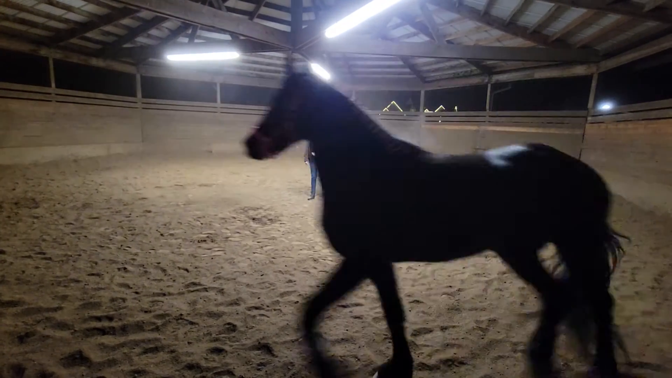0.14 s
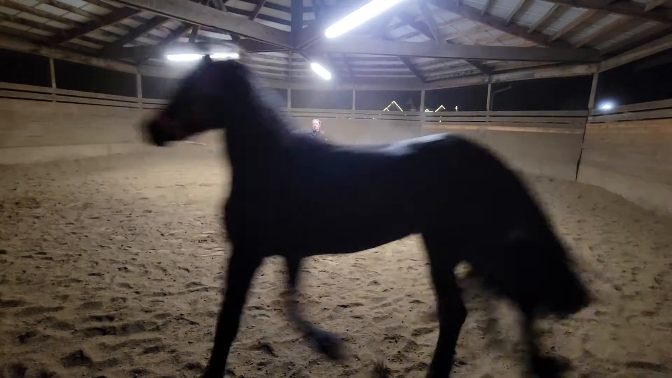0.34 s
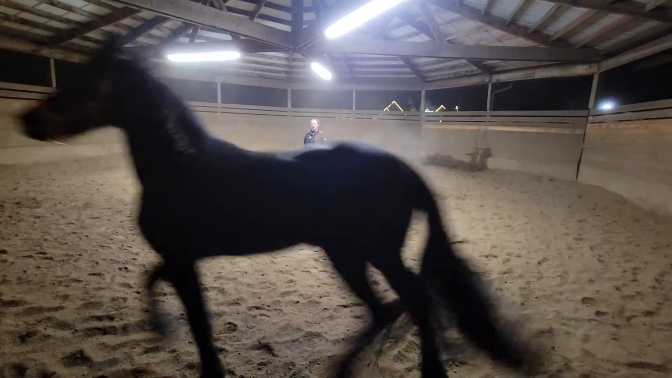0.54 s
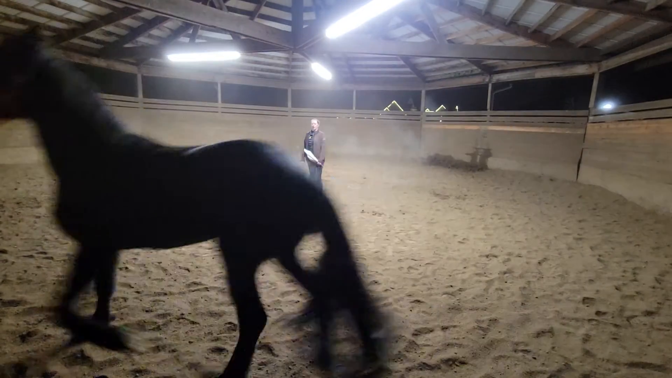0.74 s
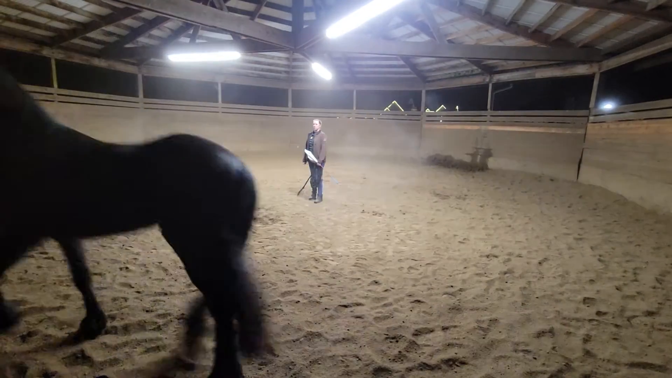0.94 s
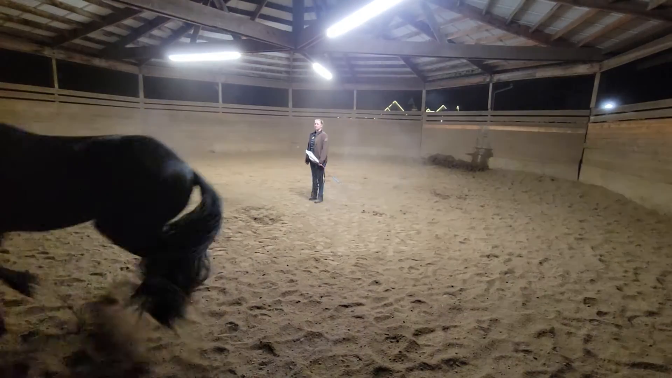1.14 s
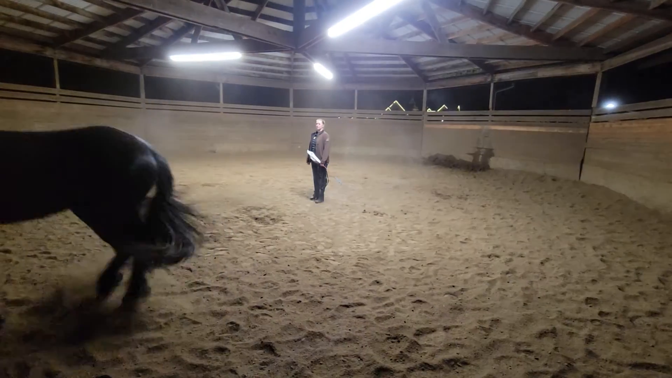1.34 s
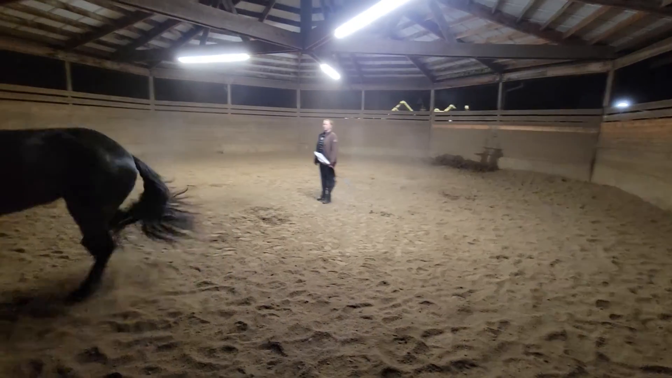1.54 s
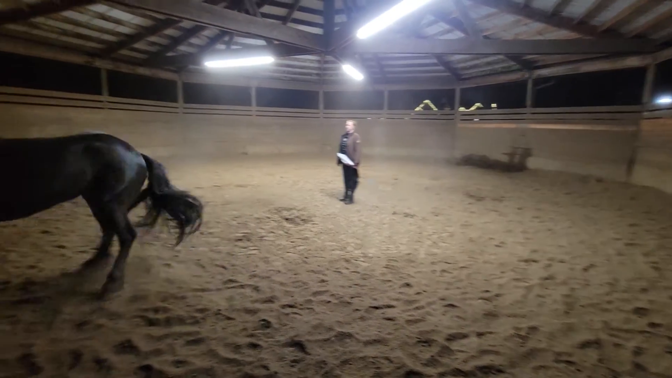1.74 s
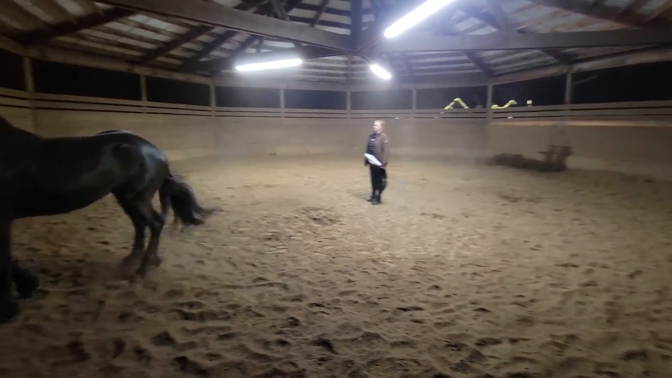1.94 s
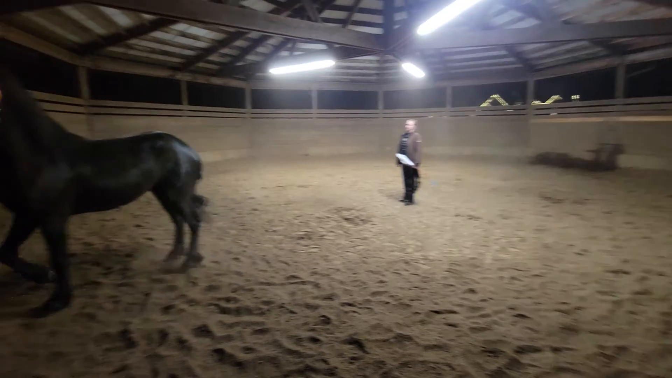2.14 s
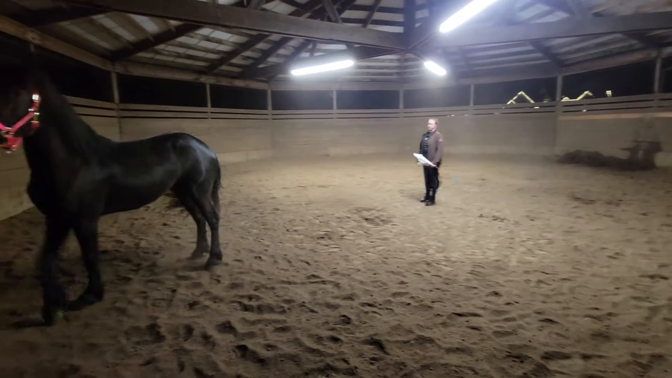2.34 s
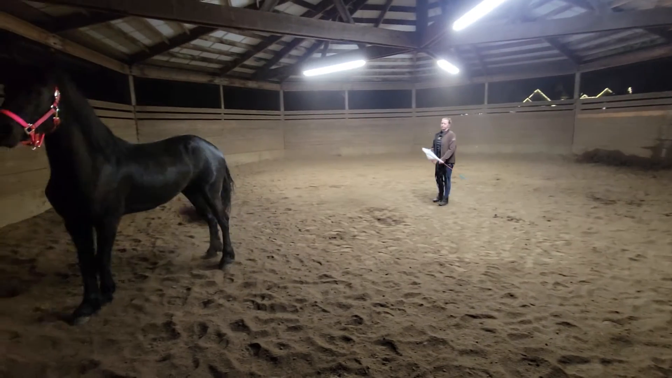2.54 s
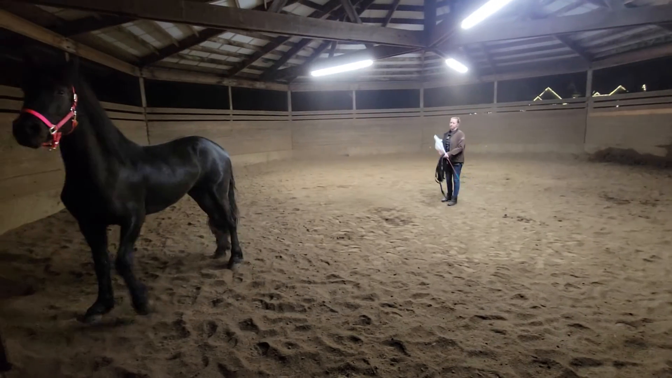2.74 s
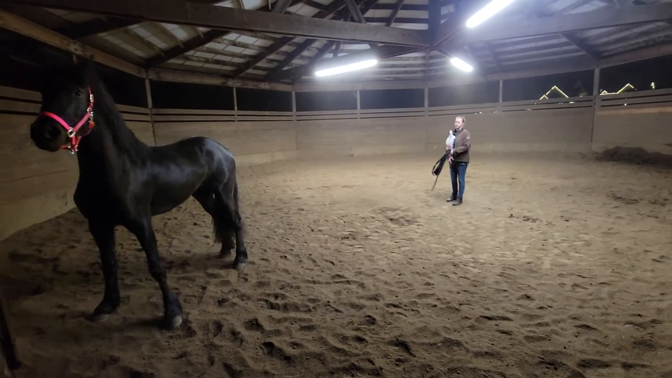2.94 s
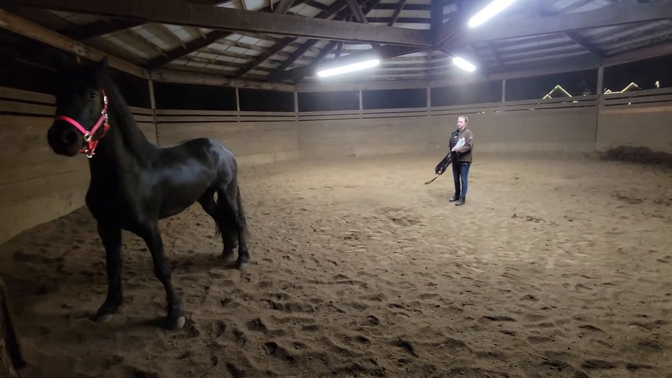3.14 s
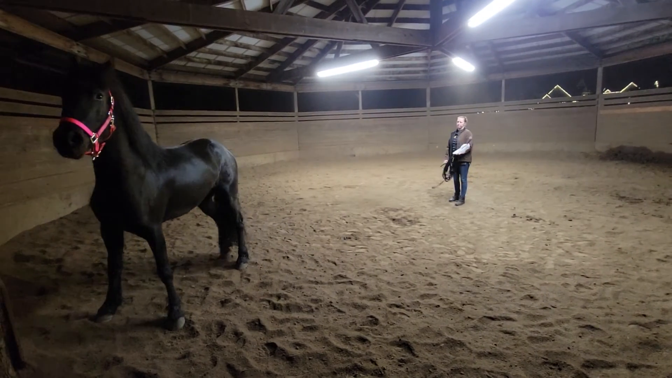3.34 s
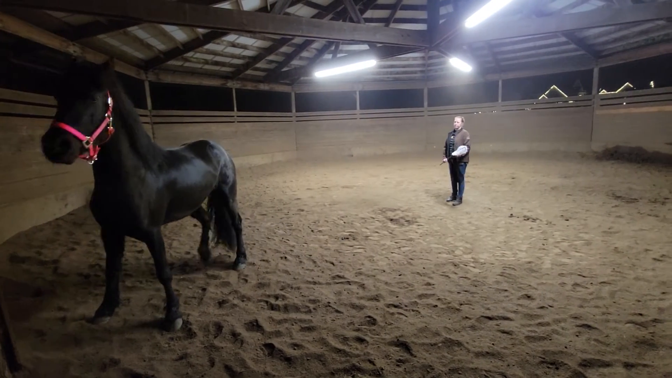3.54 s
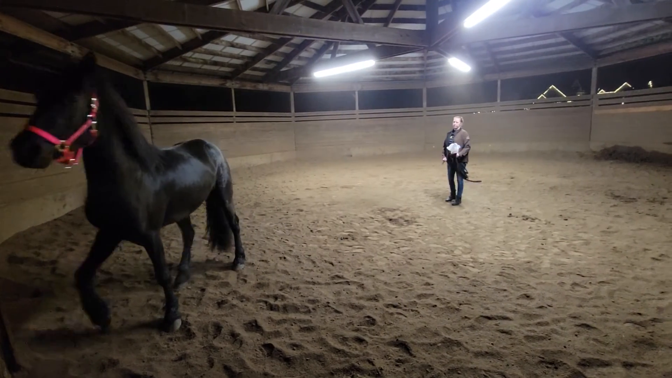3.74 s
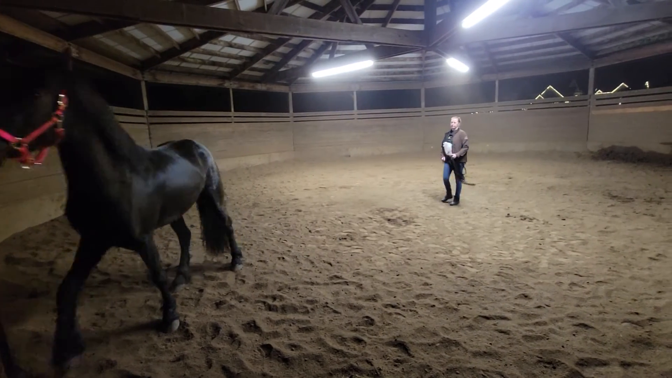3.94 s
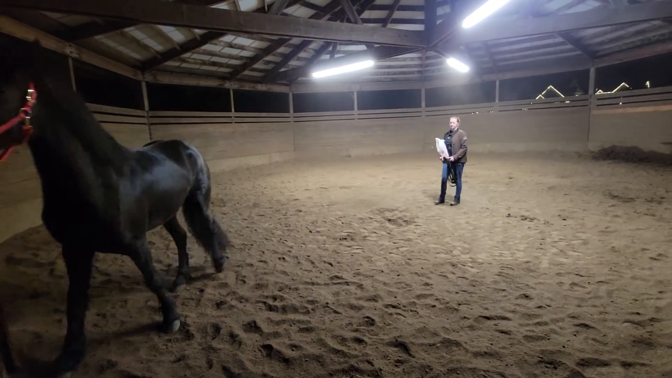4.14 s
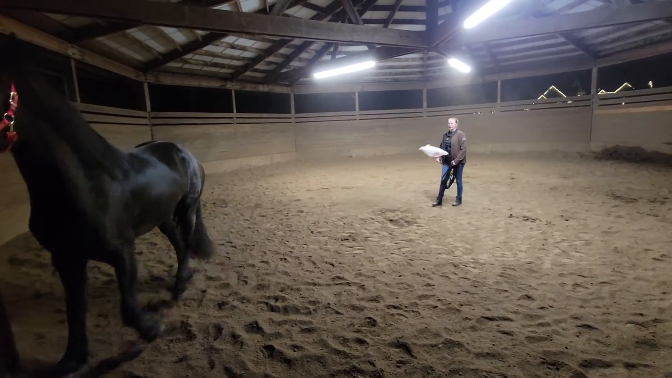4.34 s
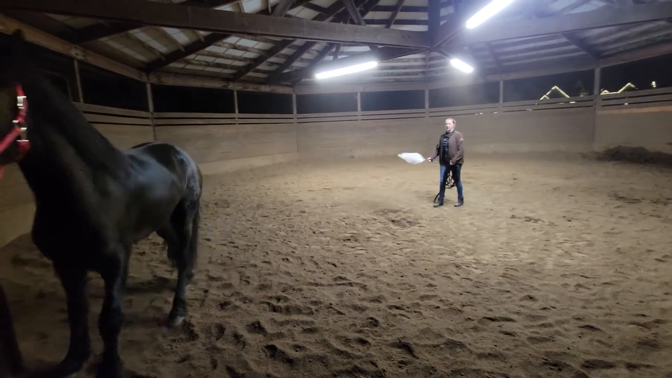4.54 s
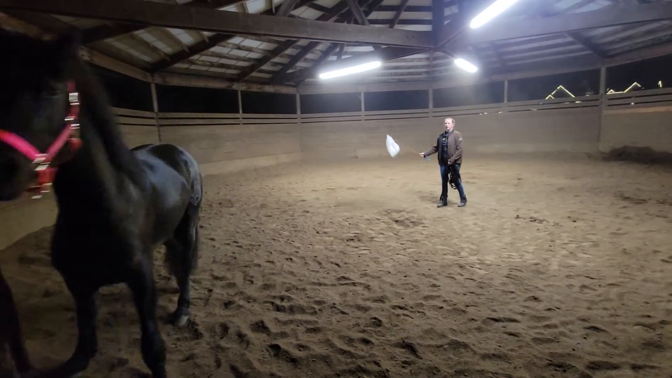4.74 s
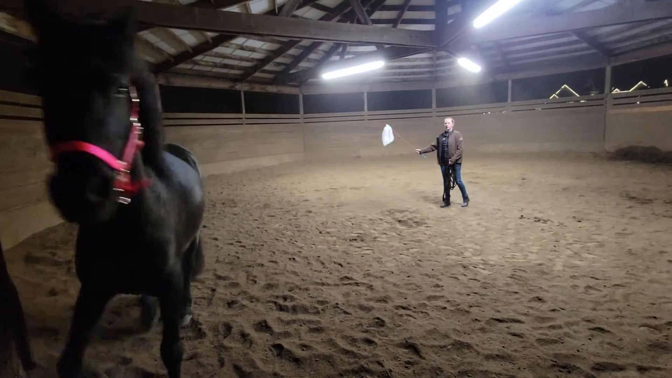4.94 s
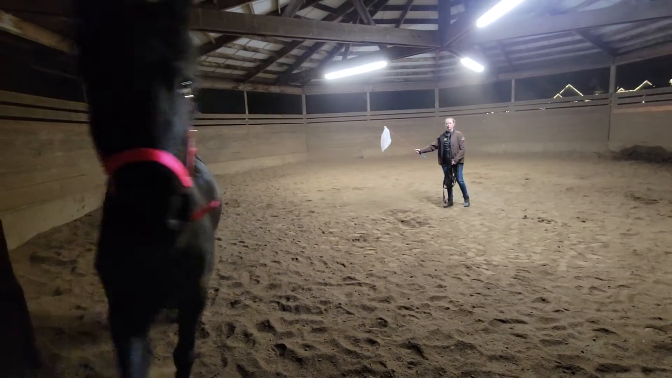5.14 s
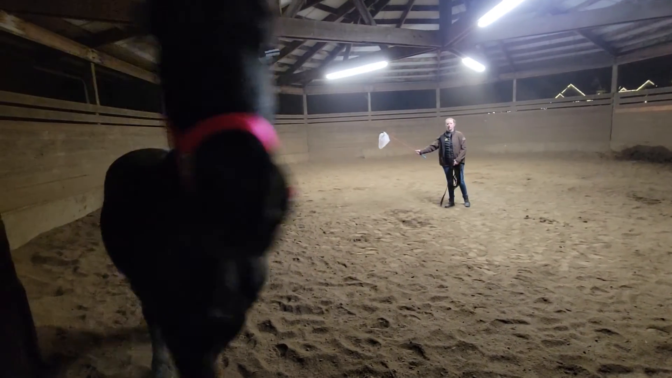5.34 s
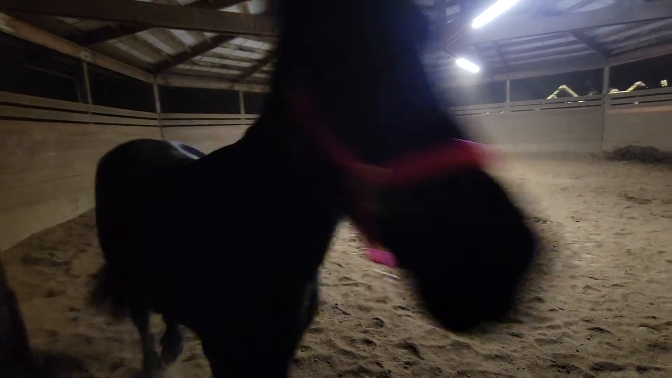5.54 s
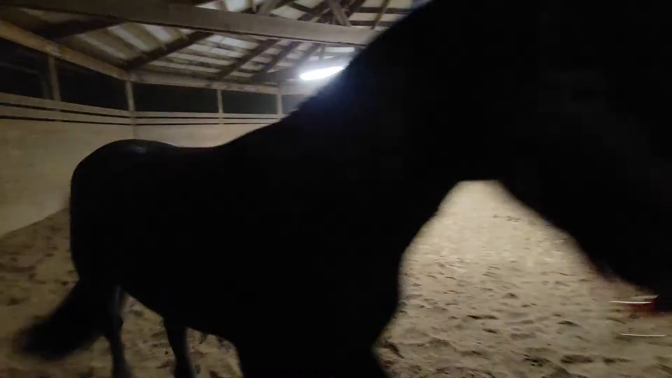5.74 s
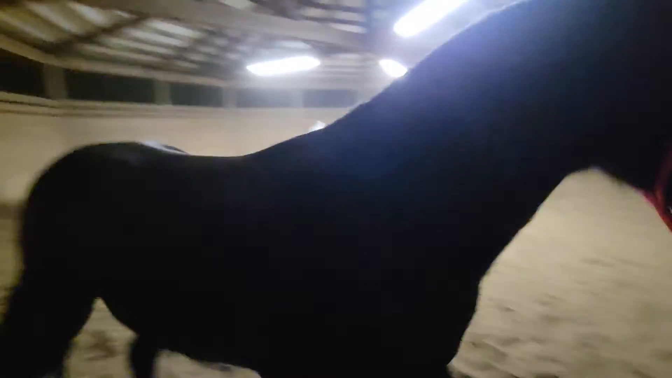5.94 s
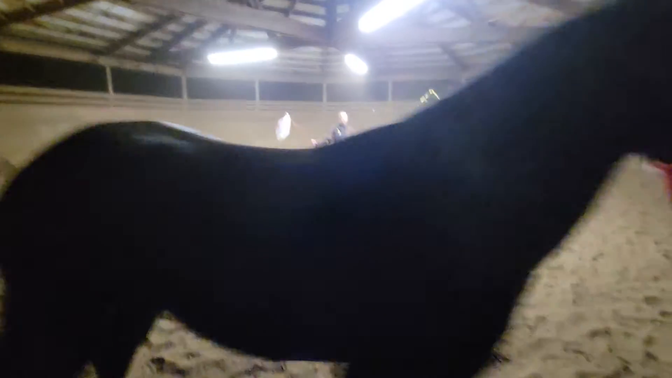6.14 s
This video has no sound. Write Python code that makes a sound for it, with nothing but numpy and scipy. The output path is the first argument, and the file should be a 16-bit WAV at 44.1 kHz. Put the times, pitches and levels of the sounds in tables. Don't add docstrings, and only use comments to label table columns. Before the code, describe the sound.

A horse trots close past in deep sand with muffled thuds and a jingling halter, halts, then walks by as a distant engine climbs and shifts.

```python
import sys
import numpy as np
from scipy import signal
from scipy.io import wavfile
from scipy.ndimage import uniform_filter1d

SR = 44100
rng = np.random.default_rng(int(sys.argv[2]) if len(sys.argv) > 2 else 0)


def pcm_store(signal):
    levels = np.round(np.clip(np.atleast_2d(signal), -1, 1) * 32767)
    wavfile.write(sys.argv[1], SR, levels.astype(np.int16).T)


def nominal_scale(level):
    x = np.asarray(level, float) / 20
    return 10 ** x


N = 276948

# start in seconds, peak in dB, ground pitch in Hz, hoof knock pitch in Hz,
# knock over ground in dB.
HOOF_BLOWS = [(0.0207, -16, 232, 250, 14.5), (.031, -22.5, 190, 257, 8.5), (.043, -25, 115, 290, 2.5),
              (0.4132, -19, 156, 270, 6), (.424, -32, 187, 247, 12), (0.575, -37, 82, 226, -21),
              (0.75, -30.5, 157, 560, 5.5), (0.796, -41, 153, 255, 9), (0.9043, -26.5, 105, 277, 1.5),
              (1.006, -33.5, 96, 350, -1), (1.155, -35, 87.5, 277, -14), (1.197, -39, 106, 312, 15),
              (1.357, -31, 108, 341, 14), (1.363, -20.5, 102, 251, -5), (1.394, -39.5, 103, 250, 12),
              (1.438, -33.5, 161, 246, 5.5), (1.533, -38, 109, 250, 17.5), (1.780, -37.5, 136, 342, 15.5),
              (2.012, -34, 117, 343, 2), (4.107, -38, 127, 276, -3), (5.296, -37.5, 101, 324, 11.5),
              (5.3046, -29, 98, 198, 1), (5.446, -35, 149, 327, 16.5), (5.524, -39, 130, 380, 7),
              (5.893, -35.5, 96, 747, 7.5)]
# start in seconds, peak in dB, pitch in Hz, left-right in dB.
LUMPS = [(0.065, -30.5, 480, 3), (0.376, -36, 554, -8), (0.389, -28, 452, -1.5), (0.417, -15.5, 690, -1),
         (0.427, -25, 585, 12), (0.735, -39, 867, 5), (0.754, -25, 600, -9), (0.786, -25, 985, 11),
         (1.125, -24, 800, 0.5), (1.158, -29, 530, 4), (1.176, -35, 486, 5), (1.209, -28, 738, -4),
         (1.358, -33, 506, 5), (1.533, -32, 546, 10), (1.65, -22, 1150, 0), (1.874, -38, 540, 4),
         (1.958, -27, 810, 6), (1.987, -30, 497, 2), (2.004, -23, 960, 12), (4.586, -34, 500, -2.0),
         (5.295, -27, 446, -6.5), (5.389, -32, 482, -9), (5.448, -22.5, 513, -7), (5.475, -34, 1070, -1.5),
         (5.527, -29, 840, 5), (5.546, -17, 1230, -1), (5.893, -21.5, 820, 3), (6.0, -35, 456, -20),
         (6.126, -32, 598, -5), (6.198, -34, 579, -2.5)]
# frequency in Hz, density in dB per Hz.
SAND_COLOUR = [(90, -25), (160, -5.5), (300, -11), (640, -10.5), (1500, -16), (2400, -22), (3400, -21),
               (5000, -25), (8000, -34), (10600, -44), (13500, -34.5), (16000, -42.5)]
# peak in seconds, effort in dB, spread in seconds, fineness of the top in dB, weight of the bottom in dB.
SAND_STEPS = [(0.022, -51, 0.16, -22.5, 5), (0.381, -51, 0.021, -7.5, 4), (0.41, -46.5, 0.063, -17, -0.5),
              (0.743, -54, 0.047, -10, -2.5), (0.785, -47.5, 0.056, -19, 1), (0.914, -53.5, 0.054, -11, 4),
              (1.009, -58.5, 0.069, -6.5, 2.5), (1.136, -51.5, 0.03, -10, 4),
              (1.181, -49.5, 0.1, -13.5, 5.5), (1.362, -51, 0.028, -9, 10.5), (1.547, -49, 0.044, -15, 4.5),
              (1.922, -56.5, 0.27, -18, 7.5), (2.014, -56, 0.046, -17, 10),
              (2.452, -59.5, 0.056, -18, 3), (2.999, -62, 0.048, -21, 3), (3.48, -64, 0.36, -15.5, -1),
              (3.75, -56, 0.19, -13.5, -2), (3.97, -59, 0.15, -13, -33), (4.111, -56.5, 0.048, -20.5, 4.5),
              (4.557, -61, 0.23, -22, 0), (4.74, -59, 0.22, -15, -1), (4.969, -57.5, 0.084, -19.5, -1),
              (5.38, -59.5, 0.1, -8, -9), (5.451, -48.5, 0.13, -13, 0.5), (5.529, -50.5, 0.025, -15, 6.5),
              (5.66, -58, 0.06, -50, -1), (5.71, -61, 0.1, -14, -20), (5.902, -52, 0.045, -22, 5.5),
              (6.027, -53, 0.082, -34, 7.5), (6.114, -52.5, 0.029, -44, 2.5),
              (6.167, -59.5, 0.031, -0.5, -5), (6.198, -50, 0.047, -13, 2.5)]
# time in seconds, level in dB.
SETTLING_SAND = [(0, -76), (.3, -62.5), (.68, -68), (1.1, -60.5), (1.6, -59.5), (1.85, -58), (2.15, -69),
                 (2.9, -74), (3.35, -77), (4.2, -65.5), (4.9, -86), (5.05, -66.5), (5.3, -63),
                 (5.87, -71.5), (6.28, -64.5)]
# time in seconds, left port's lead as a share of the port gap.
HOOF_PATH = [(0, -.9), (.385, -.8), (.41, .5), (1.1, .9), (1.8, 1.1), (5.3, .75), (5.45, .4), (5.9, 1.2)]
# start in seconds, peak in dB, upper twin in dB, pitch in Hz as it hangs,
# seconds until leather touches it.
RING_STRIKES = [(.157, -69, 6, 6300, 0.05), (0.2673, -33.5, -8, 6230, 0.11), (0.569, -45, 0, 6240, 0.012),
                (0.621, -63, -12, 6210, 0.058), (.7287, -55.5, 5.5, 6250, 0.0065),
                (.794, -66, 12, 6100, 0.017), (0.955, -46, 9, 5990, .006), (0.962, -34.5, 1, 6233, 0.024),
                (0.991, -42.5, 7.5, 6226, 0.038), (1.005, -46.5, -12, 6170, 0.12),
                (1.324, -51.5, 7.5, 6260, 0.1), (1.425, -45, 1, 6260, 0.015),
                (1.527, -52, -9, 6200, 0.0084), (1.626, -48.5, -7, 6250, 0.023),
                (1.7086, -45, 15, 6200, 0.017), (1.724, -50, 8.5, 6200, 0.066),
                (2.207, -63, 10, 6260, 0.013), (5.176, -53, 3.5, 6280, 0.0038),
                (5.191, -71, -6, 6260, 0.053), (5.612, -55, 4.5, 6250, 0.007), (5.627, -67, 3, 6150, 0.022)]
# pitch ratio, level in dB, t60 in seconds.
RING_TWINS = [(1, 0, .5), (1.043, -3, .2)]
# time in seconds, left-right in dB.
HEAD_PATH = [(.2, -13.5), (1.7, -4), (2.3, -9)]
# start in seconds, clasp in dB, ring overtones in dB, factor on the t60.
CLASP_KNOCKS = [(0.157, -39, -51, 0.88), (0.2671, -47, -67, 1.9), (0.571, -51, -43, 1),
                (0.729, -47, -54, 0.52), (0.96, -57, -44, 0.88), (1.002, -43, -56, 2),
                (1.427, -55, -53, 0.93), (1.6254, -57, -54, 0.43), (1.708, -62, -56, 1.1),
                (2.205, -56, -62, 0.77), (5.175, -47, -59, 0.45)]
# frequency in Hz, level in dB, t60 in seconds.
CLASP_MODES = [(3790, -5, .04), (3900, -7, .04), (5470, -5, .04), (5700, 0, .045), (5880, -5, .03),
               (7400, -6, .02), (8950, -1, .024), (13100, -3, .03), (14700, -7, .02)]
# frequency in Hz, level in dB, t60 in seconds.
RING_OVERTONES = [(11365, -11, .13), (11690, -5, .07), (11960, 0, .06), (12190, 0, .05), (12500, -4, .035)]
# start in seconds, peak in dB, pitch in Hz, t60 in seconds.
FREE_PARTS = [(0.1574, -31.5, 5700, 0.023), (.1565, -38.5, 8900, 0.025), (.1565, -62, 3760, .04),
              (.159, -48, 11550, 0.12), (.177, -49, 3760, 0.033), (.2685, -39, 3820, 0.055),
              (0.2678, -31, 5650, 0.033), (.279, -39, 5670, .03), (0.268, -35, 9040, 0.022),
              (.2672, -41, 14000, .025), (.27, -43, 12800, .06), (.274, -45, 12000, .09),
              (.272, -50.5, 11660, 0.44), (.5695, -41, 7360, 0.026), (.728, -44, 12160, .06),
              (.793, -45, 3800, 0.051), (.961, -37, 12000, .025), (.972, -36.5, 12200, 0.14),
              (1.625, -35.5, 8900, .025), (1.6254, -41, 5700, 0.039), (1.71, -39.5, 12190, 0.16),
              (1.714, -55, 11800, 0.14), (1.72, -47, 11800, .25), (1.8338, -42.5, 5800, 0.04),
              (1.8345, -45, 7400, 0.041), (2.2043, -44, 3900, 0.037), (2.2037, -41.5, 5750, 0.031),
              (2.2043, -41.5, 8960, 0.022), (4.5337, -46.5, 3280, 0.032), (4.747, -42.5, 2760, 0.09),
              (4.75, -47.5, 6250, 0.033), (4.765, -57.5, 2730, 0.58), (5.2074, -44.5, 2490, 0.03),
              (5.2065, -49, 5150, .04), (5.219, -48, 3120, .04), (5.226, -54, 5030, 0.046),
              (5.651, -51.5, 2740, 0.11), (5.664, -54, 5160, .06), (5.692, -41, 5530, 0.032),
              (5.694, -48, 3800, .025)]
# start in seconds, peak in dB, centre in Hz.
SHORT_KNOCKS = [(0.236, -46, 3800), (0.375, -46, 4230), (0.702, -44.5, 4280), (0.752, -39, 1600),
                (1.123, -39.5, 4280), (1.355, -38.5, 4500), (1.5248, -35, 3970), (1.542, -38, 3800),
                (1.803, -43, 4115), (2.007, -36.5, 1790), (2.4394, -44, 3660), (4.533, -42, 2480),
                (5.207, -50, 2720), (5.297, -40.5, 1800), (5.427, -35.5, 2650), (5.545, -39, 2870),
                (5.893, -34.5, 2830), (6.024, -41.5, 2400), (6.1055, -41, 2260), (6.105, -48.5, 4470)]
# start in seconds, peak in dB, centre in Hz,
# t60 in seconds.
SCRAPES = [
    (1.154, -39, 1160, 0.31),
    (1.149, -38.5, 4300, 0.26),
    (1.653, -46, 1735, 0.29),
    (1.908, -46, 1540, 0.61),
    (4.533, -42, 5940, 0.087),
    (4.748, -56, 2670, 1),
    (4.75, -40.5, 2920, 0.075),
    (5.207, -52, 4960, 0.1),
    (5.6465, -46, 5140, 0.19),
    (5.649, -59, 2800, 0.12),
]
# start in seconds, peak in dB, tilt of the part above 10.5 kHz against the
# rest in dB, left-right in dB.
GRAIN_HITS = [(0.0145, -28, -4, -4), (0.156, -32, -3, 6), (0.2666, -24, 10, -1), (0.3757, -37, -3, -8),
              (0.417, -24, 10, 0), (0.502, -37, -3, 2), (0.529, -31, 13, -7), (0.571, -29.5, -2, 0),
              (0.7346, -25, -6, 2), (0.792, -28, -12, 10), (0.9085, -24, -8, -3), (.961, -23, 5, 4),
              (1.003, -18, 6, 2), (1.3574, -26, -12, -1.5), (1.524, -23, -5, -1.5), (1.709, -43, 10, 13),
              (1.942, -29, -14, -4), (2.204, -38, 2, -3), (4.533, -33, 4, -4), (5.0513, -25.5, -6.5, -5),
              (5.114, -28.5, 0, -5), (5.164, -33, 1, -5), (5.177, -29, 0, -7), (5.3423, -44, 3, -7),
              (5.454, -19, 7, -7), (5.526, -37, 13, -15), (5.69, -38, 0, -1), (5.693, -25.5, 14, -11),
              (5.699, -35, 6, 0), (5.744, -29.5, -2, -10), (5.801, -39, -2, -9), (5.881, -33, 2, -5),
              (5.918, -44, 7, -6), (5.94, -44, 6, -5), (5.9697, -25, 6, -11), (6.0043, -23, 5, -9),
              (6.146, -42, 2, -3), (6.159, -24.5, 0, -2), (6.198, -30, -4, -6)]
# frequency in Hz, t60 in seconds.
ECHO_T60 = [(60, 0.91), (300, 0.95), (1000, 0.63), (4000, 0.24), (12000, 0.24)]
# time in seconds, rate in Hz.
ENGINE_SPEED = [(2.3, 81.3), (3.5, 85.3), (4.5, 91.6), (5.0, 95), (5.45, 98)]
# multiple of the firing rate, level in dB.
EXHAUST_ORDERS = [(1, 0), (1.5, -10), (2, -3), (2.25, -13.5), (2.75, -5.5), (3, -2), (3.748, -7), (4, -1.5),
                  (4.25, -6), (4.753, -10.5), (5.252, -6), (5.749, 0.5), (6.5, -11)]
# resonance in Hz, width in Hz, level in dB.
WALL_RESONANCES = [(74.5, 2.1, -37), (91.3, 2.5, -45), (142, 6.2, -50), (173.2, 3.3, -47.5),
                   (190, 5.6, -50), (250, 26, -54.5), (271, 19, -53.5), (350, 20, -62.5)]
# time in seconds, pitch in Hz, level in dB.
AFTER_SHIFT = [
    (5.4, 146.8, -52),
    (6.09, 144.1, -60.5),
    (6.28, 158, -103),
]
# frequency in Hz, density in dB per Hz.
AIR_COLOUR = [(12, -87), (20, -49), (52, -5.5), (81, -2), (127, -12.5), (198, -20), (216, -17),
              (255, -16.5), (337, -16), (446, -32), (558, -20.5), (825, -32), (1090, -29.5), (2350, -43),
              (3200, -42), (6010, -66.5), (16000, -70)]
# time in seconds, bass gain in dB.
RUMBLE_SWELL = [(0.0, 10.5), (0.58, 2.5), (1.82, 6), (2.2, 2.5), (3.64, 4.5), (4.35, 3), (6.28, 3)]
# frequency in Hz, likeness from 0 to 1.
FAR_LIKENESS = [(60, 0.94), (150, 1), (380, 0.96), (950, 0.97), (2380, 0.061), (5980, 0.25), (15000, 0.12)]
# frequency in Hz, likeness from 0 to 1.
NEAR_LIKENESS = [(60, 0.87), (150, 1), (380, 0.71), (950, 0.61), (2380, 0.37), (5980, 0.023),
                 (15000, 0.036)]
# frequency in Hz, left-right in dB.
PORT_LEAN = [(60, 0), (150, -1.5), (380, 0), (950, -2), (2380, -1), (5980, -13), (9000, 3), (14000, -1)]

OPPOSED_HZ = 1290
STRIKE_S = .0009


def hooves(sag=0.76, sag_s=0.0013, rise_s=0.0021, late_s=0.0016):
    out, t = np.zeros((2, N)), np.arange(8000) / SR
    clock = t + sag * sag_s * (1 - np.exp(-t / sag_s))
    for s, db, ground_hz, knock_hz, knock_db in HOOF_BLOWS:
        t60 = 0.059 * 100 / ground_hz
        ground = (1 - np.exp(-t / late_s)) ** 2 * nominal_scale(4.5 - 60 * t / t60) * np.sin(2 * np.pi * ground_hz * t)
        knock = (1 - np.exp(-t / rise_s)) ** 2 * nominal_scale(knock_db - 3 - 60 * t / (0.82 * t60))
        knock *= np.sin(2 * np.pi * knock_hz * clock)
        edge = 1 + .5 * np.cos(2 * np.pi * 1.56 * knock_hz * t) * np.exp(-t / 0.0049)
        add(out, s, nominal_scale(db + 3.5) * (knock * edge - ground))
    return out


def clods(rise_s=0.0011, sag=0.48, cycles=10.5, crumb_db=-7):
    out, t = np.zeros((2, N)), np.arange(2000) / SR
    noise = rng.standard_normal((len(LUMPS), len(t)))
    crumbs = evened(signal.lfilter(*signal.butter(2, [500, 1800], "band", fs=SR), noise))
    for (s, db, hz, pan_db), crumb in zip(LUMPS, crumbs):
        fall = nominal_scale(db - 4 - 60 * t * hz / cycles) * (1 - np.exp(-t / rise_s))
        thump = np.sin(2 * np.pi * hz * t * (1 + sag * np.exp(-t * hz)))
        add(out, s, fall * (thump + nominal_scale(crumb_db) * crumb), pan_db)
    return out


def scuff(grains_per_s=2500, smooth=1.0, clump_db=2.5, size=256):
    grains = (rng.random(N) < grains_per_s / SR).astype(float)
    crackle = smooth + evened(signal.lfilter([1], [1, -.93], grains))
    hiss = evened(crackle * rng.standard_normal((2, N)))
    hz, t, z = wide(*hiss, size, NEAR_LIKENESS, left_leads=HOOF_PATH)
    colour = read(SAND_COLOUR, hz)
    clumps = evened(uniform_filter1d(uniform_filter1d(rng.standard_normal(z.shape[1:]), 5, 0), 9, 1))
    z = z * nominal_scale(clump_db * clumps)
    z = z * nominal_scale(colour + 3.0) * effort(hz, t)
    return back(z, size) / band_rms(colour, hz, 1200, 8200)


def effort(hz, t, drop_db=19.5, roundness=1.61, rise=0.7):
    top, bottom = np.clip((hz - 5000) / 3000, 0, 1), np.clip((1500 - hz) / 600, 0, 1)

    def tint(fine_db, weight_db):
        return nominal_scale(top * (fine_db + 22.5) + bottom * (weight_db - 1.5)) ** 2

    bed_db, = follow(SETTLING_SAND, t)
    spray_db = np.interp(t, [0, 4.4], [-9, -18.5])
    heavy_db = 6 - 0.8577 * (bed_db + 64.5)
    bed = nominal_scale(bed_db) ** 2 * tint(spray_db, heavy_db)
    s, db, spread_s, fine_db, weight_db = np.transpose(SAND_STEPS)[:, :, None]
    apart = np.maximum(t - s, (s - t) / rise) / spread_s
    steps = tint(fine_db.T, weight_db.T) @ nominal_scale(db - drop_db * apart ** roundness) ** 2
    return np.sqrt(bed + steps)


def halter_ring(touch_s=.007, wobble=.67):
    out, t = np.zeros((2, N)), np.arange(12000) / SR
    for (s, db, twin_db, hz, free_s), turn in zip(RING_STRIKES, rng.random((len(RING_STRIKES), 2))):
        damp = 1.54 * np.exp(-np.maximum(t - free_s, 0) / touch_s) + 0.0044
        damp *= 1 - np.exp(-t / STRIKE_S)
        swing = 1 + wobble * np.sin(2 * np.pi * ((40 + 40 * turn[0]) * t + turn[1]))
        lower = (0.91 + 0.1 * swing) * rings(RING_TWINS[:1], t, hz)
        upper = nominal_scale(twin_db) * swing * rings(RING_TWINS[1:], t, hz)
        add(out, s, nominal_scale(db + 3.5) * damp * (lower + upper), *follow(HEAD_PATH, s))
    return out


def clasp():
    out, t = np.zeros((2, N)), np.arange(12000) / SR
    for s, clasp_db, high_db, lasting in CLASP_KNOCKS:
        add(out, s, nominal_scale(clasp_db - 6.5) * rattle(CLASP_MODES, t, lasting), -6.)
        add(out, s, nominal_scale(high_db + 1.0) * rattle(RING_OVERTONES, t, lasting), 3.)
    return out


def rattle(modes, t, lasting, chatter_s=0.0055, uneven_db=2.0, rough=.5):
    modes = np.multiply(modes, [1, 1, lasting]) + uneven_db * rng.standard_normal((len(modes), 1)) * [0, 1, 0]
    contacts = rng.standard_normal(800) * (rng.random(800) < .03) * np.exp(-t[:800] / chatter_s)
    contacts[0] = 0.79
    rubbing = 1 + rough * evened(uniform_filter1d(rng.standard_normal(len(t)), 70))
    ring = rubbing * rings(modes, t, rng.normal(1, .003))
    return signal.oaconvolve(ring, contacts / np.linalg.norm(contacts))[:len(t)]


def pings(rough=.7, partner_db=-9.):
    out, t = np.zeros((2, N)), np.arange(9000) / SR
    rubbing = 1 + rough * evened(uniform_filter1d(rng.standard_normal((len(FREE_PARTS), len(t))), size=90))
    for (s, db, hz, t60), rub in zip(FREE_PARTS, rubbing):
        pair = rings([(hz, db, t60), (1.016 * hz, db + partner_db, t60)], t, 0.98)
        pan_db = np.interp(hz, [6000, 9000], [-6., 2.5])
        add(out, s, (1 - np.exp(-t / STRIKE_S)) * rub * pair, pan_db)
    return out


def tack_knocks(narrow=0.2, spill_db=-29.0, tick_t60_s=0.07, lag_turns=.33):
    out, t = np.zeros((2, N)), np.arange(9000) / SR
    middle = signal.butter(1, [1200, 8000], "band", fs=SR)
    for s, db, hz, t60 in [(*row, tick_t60_s) for row in SHORT_KNOCKS] + list(SCRAPES):
        noise = rng.standard_normal(len(t))
        hollow = signal.lfilter(*signal.iirpeak(hz, (1 + 6 * t60) / narrow, fs=SR), noise)
        burst = evened(hollow) + nominal_scale(spill_db) * evened(signal.lfilter(*middle, noise))
        fall = nominal_scale(db - 2.5 - 60 * t / t60) * (1 - np.exp(-t / 0.00052))
        add(out, s, fall * burst, -4., round(lag_turns * SR / hz))
    return out


def grain_cracks(snap_s=.003):
    out, t = np.zeros((2, N)), np.arange(9000) / SR
    treble, notch = signal.butter(2, 4300, "high", fs=SR), signal.iirnotch(10400, 3, SR)
    bright = [np.convolve(*pair) for pair in zip(treble, notch)]
    for s, db, top_db, pan_db in GRAIN_HITS:
        crack = signal.lfilter(*bright, rng.standard_normal(len(t)) * np.exp(-t / snap_s))
        low = signal.lfilter(*signal.butter(2, 10500, fs=SR), crack)
        tilted = nominal_scale(-top_db / 2) * low + nominal_scale(top_db / 2) * (crack - low)
        add(out, s, nominal_scale(db - 11.0) * tilted, pan_db)
    return out


def building(x):
    taps = np.zeros((2, SR // 2))
    at = np.arange(300, SR // 2 - 20, 20)
    at = at + rng.integers(0, 20, (2, len(at)))
    np.put_along_axis(taps, at, rng.choice([-1., 1.], at.shape), 1)
    hz, t, z = wide(*taps, size=512)
    tail = back(z * nominal_scale(-60 * t / read(ECHO_T60, hz)), 512)
    return signal.fftconvolve(x.mean(0)[None], tail / np.linalg.norm(tail[0]), axes=1)[:, :N]


def engine(fade_db=2.5, waver=0.0012, nearing_db_per_s=3, between_walls_db=-67.5):
    t = np.arange(N) / SR
    coarse_t = t[::256]

    def slow():
        waves = [np.sin(2 * np.pi * (f * coarse_t + rng.random())) for f in np.geomspace(.4, 8, 6)]
        return evened(sum(waves))

    firing_hz, = follow(ENGINE_SPEED, t)
    turns = np.cumsum(firing_hz * (1 + waver * slow().repeat(256)[:N])) / SR
    out = np.zeros(N)
    for k, order_db in EXHAUST_ORDERS:
        drift_share = .5 if k in (1, 2, 2.75, 3) else 1
        drift_db = np.interp(t, coarse_t, fade_db * slow()) * drift_share
        through = nominal_scale(between_walls_db) ** 2
        for f, width, db in WALL_RESONANCES:
            through = through + nominal_scale(db) ** 2 / (1 + (2 * (k * firing_hz - f) / width) ** 2)
        level = np.sqrt(through) * nominal_scale(order_db + drift_db + nearing_db_per_s * (t - 4.0))
        out += level * np.sin(2 * np.pi * (k * turns + rng.random()))
    out *= np.sqrt(2) * np.clip((t - 2.3) / 0.4, 0, 1) * np.clip((5.45 - t) / 0.012, 0, 1)
    hz, db = follow(AFTER_SHIFT, t)
    fade_in = np.clip((t - AFTER_SHIFT[0][0]) / 0.092, 0, 1)
    return out + nominal_scale(db + 8.5) * fade_in * np.sin(2 * np.pi * np.cumsum(hz) / SR)


def air(level_db=-47, middle_db=-.4, patchy_db=2.0, size=2048):
    hz, t, z = wide(*rng.standard_normal((2, N)), size)
    low_db, = follow(RUMBLE_SWELL, t)
    bass, body = 1 / (1 + (hz / 160) ** 4), 1 / (1 + (hz / 900) ** 2)
    patches = evened(uniform_filter1d(uniform_filter1d(rng.standard_normal(z.shape[1:]), 8, 0), 6, 1))
    colour = read(AIR_COLOUR, hz)
    z = z * nominal_scale(colour + bass * low_db + (6.0 - bass) * body * middle_db + patchy_db * patches)
    return nominal_scale(level_db) * back(z, size) / band_rms(colour, hz, 40, 140)


def evened(x):
    return x / np.sqrt(np.mean(x ** 2) + 1e-20)


def read(points, hz):
    f, value = np.transpose(points)
    return np.interp(np.log(hz + 1), np.log(f + 1), value)


def follow(rows, t):
    s, *columns = np.transpose(rows)
    return [np.interp(t, s, c) for c in columns]


def add(mix, s, sound, pan_db=0., late=0):
    part = mix[:, round(s * SR):][:, :len(sound)]
    gains = nominal_scale(np.array([[.5], [-.5]]) * pan_db)
    part += gains * np.array([sound, np.roll(sound, late)])[:, :part.shape[1]]


def rings(modes, t, tune):
    return sum(nominal_scale(db - 60 * t / t60) * np.sin(2 * np.pi * hz * tune * t) for hz, db, t60 in modes)


def wide(a, b, size, likeness=FAR_LIKENESS, left_leads=((0, -1),)):
    hz, t, (left, other) = signal.stft(np.array([a, b]), SR, nperseg=size, noverlap=size * 3 // 4)
    same = np.clip(read(likeness, hz), -1, 1)[:, None]
    lean = nominal_scale(read(PORT_LEAN, hz) / 2)[:, None]
    late = np.exp(-1j * np.pi * np.outer(np.minimum(hz / OPPOSED_HZ, 1), follow(left_leads, t)))
    right = same * late * left + np.sqrt(1 - same ** 2) * other
    return hz[:, None], t, np.array([left * lean, right / lean])


def back(z, size):
    return signal.istft(z, SR, nperseg=size, noverlap=size * 3 // 4)[1][:, :N]


def band_rms(colour_db, hz, lo_hz, hi_hz):
    return np.sqrt((nominal_scale(colour_db)[(hz > lo_hz) & (hz < hi_hz)] ** 2).sum() / len(hz))


def scene():
    thuds = hooves() + clods()
    steel = halter_ring() + clasp()
    knocks = tack_knocks() + grain_cracks()
    echo = building(nominal_scale(-14.5) * thuds + nominal_scale(-10) * steel + nominal_scale(-5.5) * knocks)
    metal = steel + knocks + pings()
    metal[1] = np.roll(metal[1], shift=1)
    late = follow(HOOF_PATH, np.arange(N) / SR)[0] * SR / (2 * OPPOSED_HZ)
    thuds[1] = np.interp(np.arange(N) - late, np.arange(N), thuds[1])
    return thuds + metal + echo + scuff() + air() + engine()


def low_pass(x):
    return signal.sosfilt(signal.butter(12, 16830, fs=SR, output="sos"), x)


def record(dry):
    edge = signal.firwin(255, 15800, fs=SR)[None]
    mix = nominal_scale(-41) * dry + signal.oaconvolve(dry, edge, "same", axes=1)
    return low_pass(mix)


dry = scene()
out = record(dry)
pcm_store(out)
```